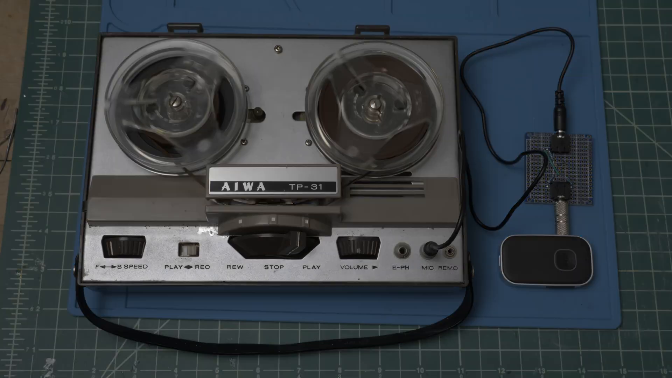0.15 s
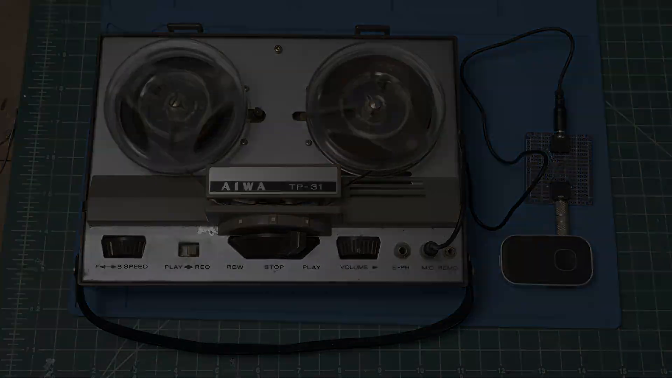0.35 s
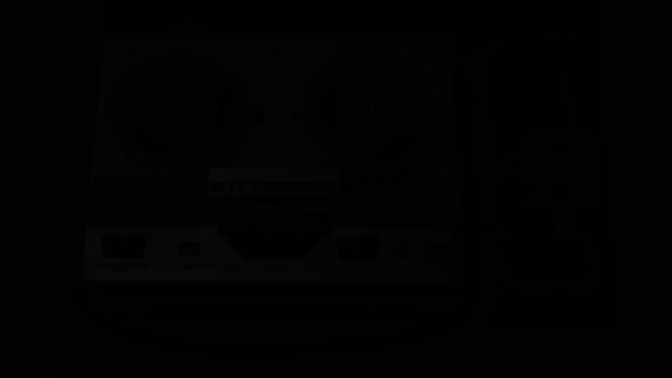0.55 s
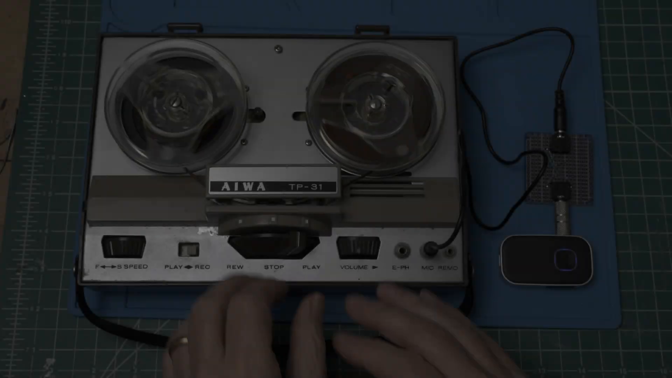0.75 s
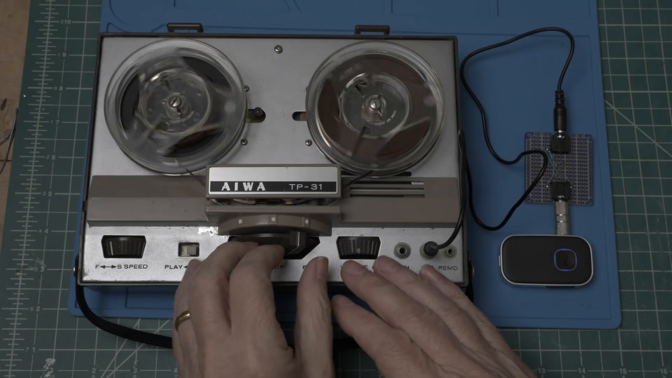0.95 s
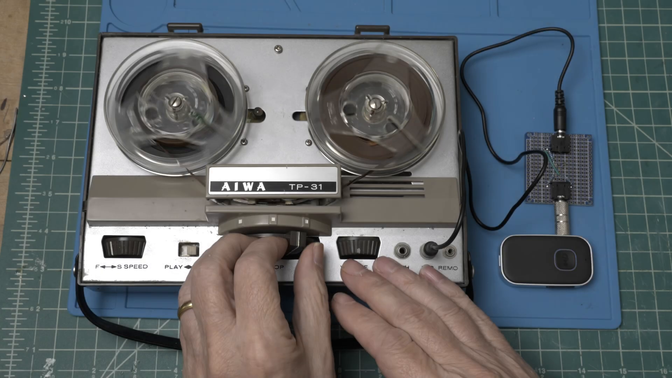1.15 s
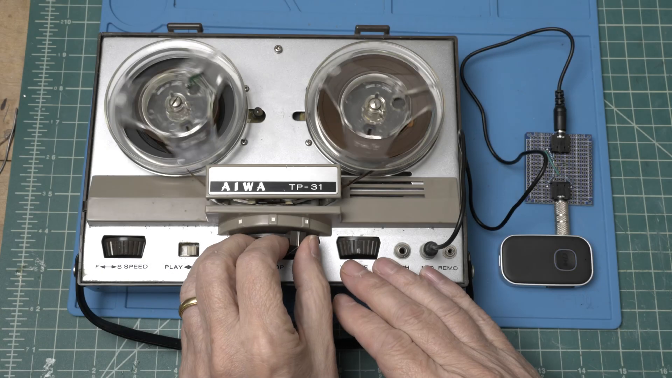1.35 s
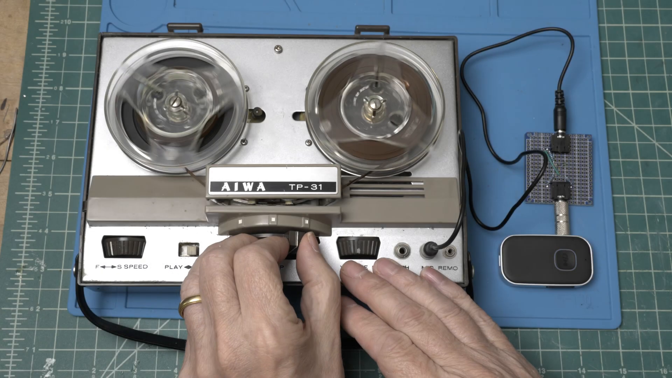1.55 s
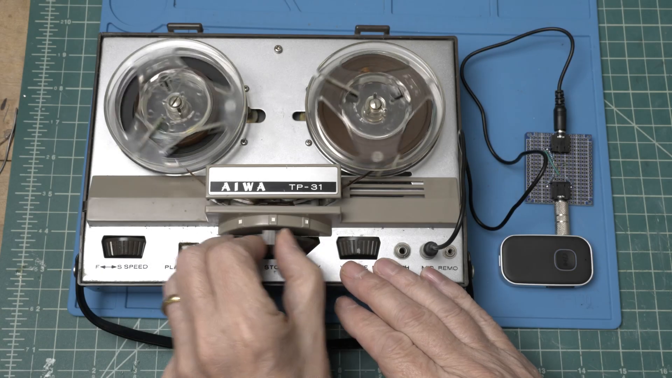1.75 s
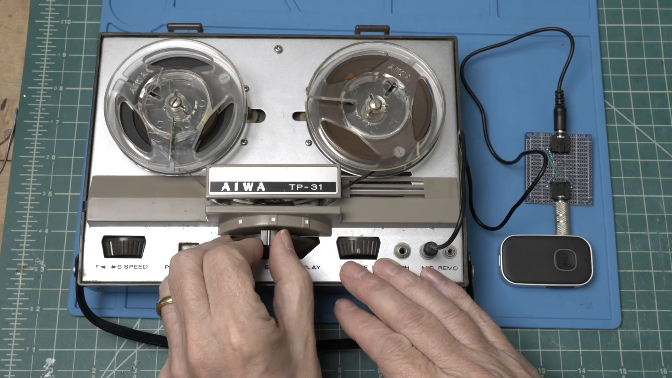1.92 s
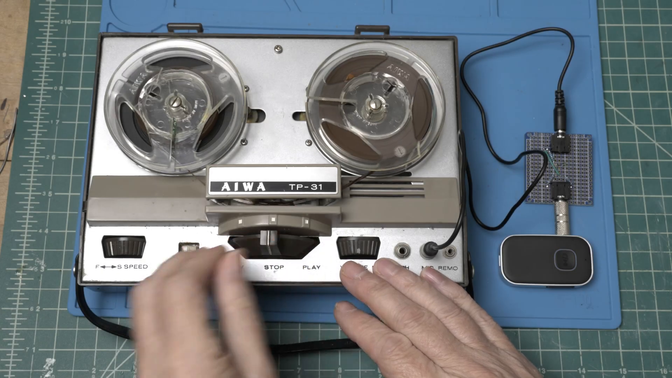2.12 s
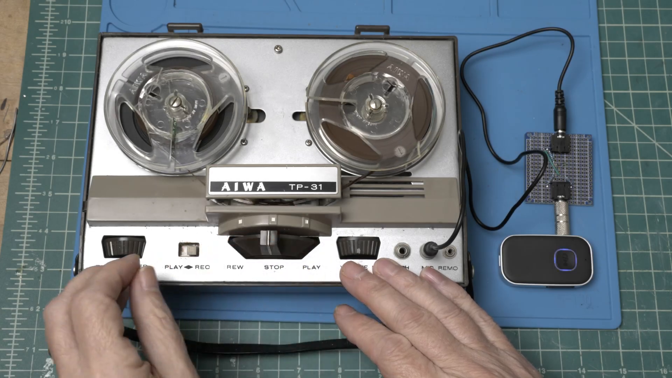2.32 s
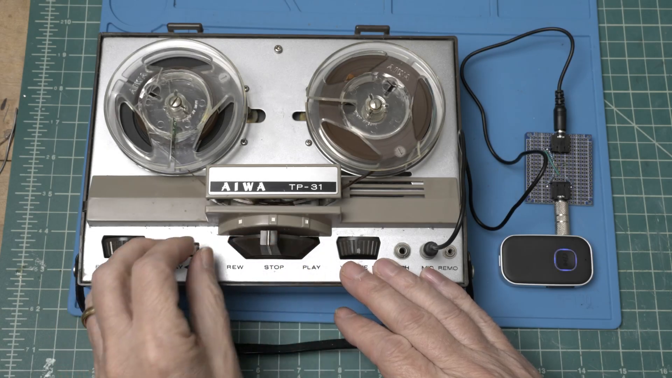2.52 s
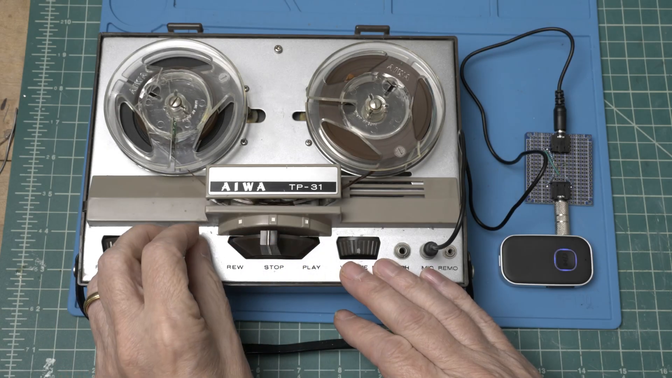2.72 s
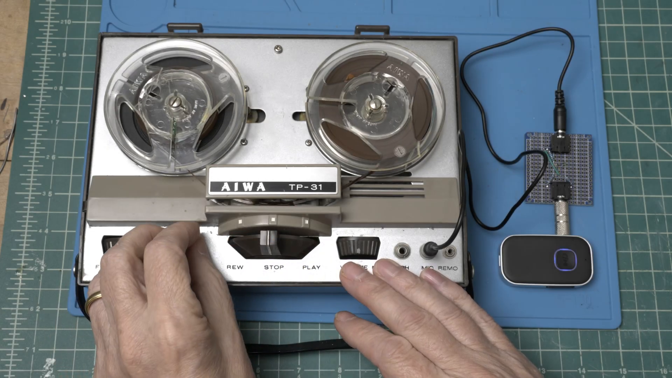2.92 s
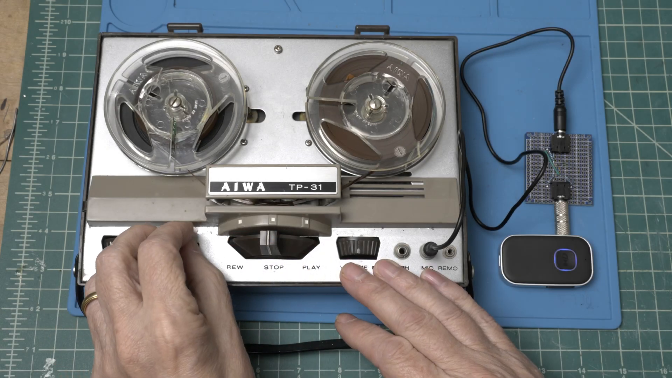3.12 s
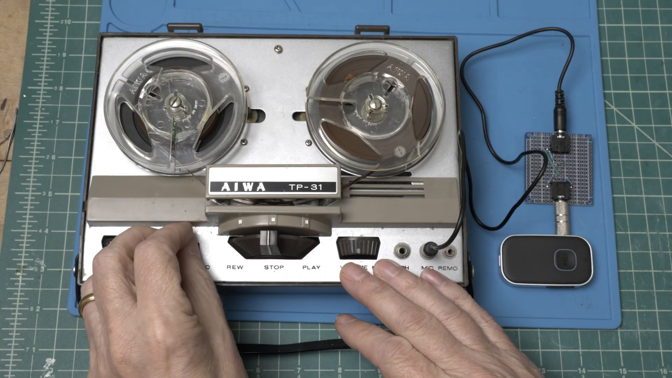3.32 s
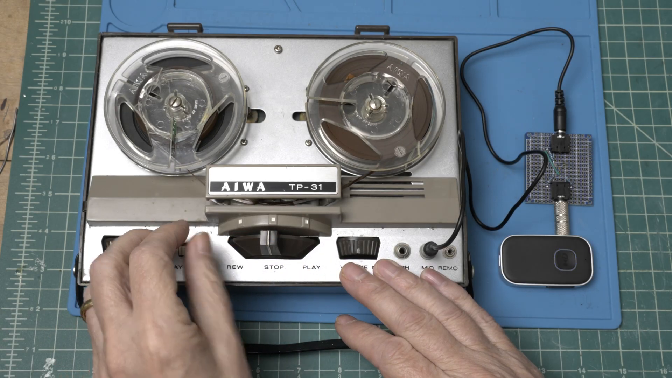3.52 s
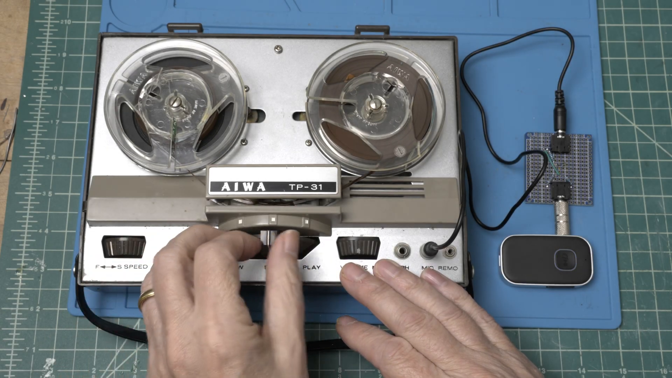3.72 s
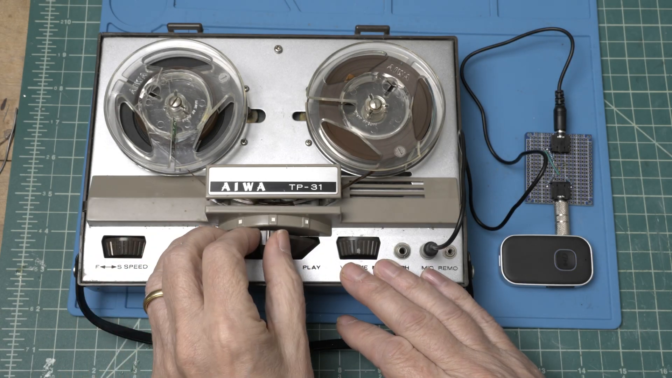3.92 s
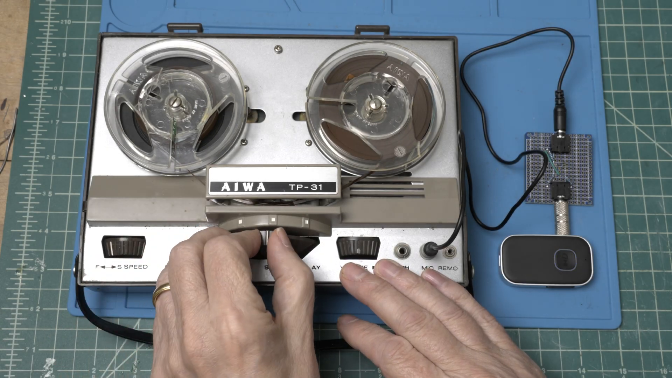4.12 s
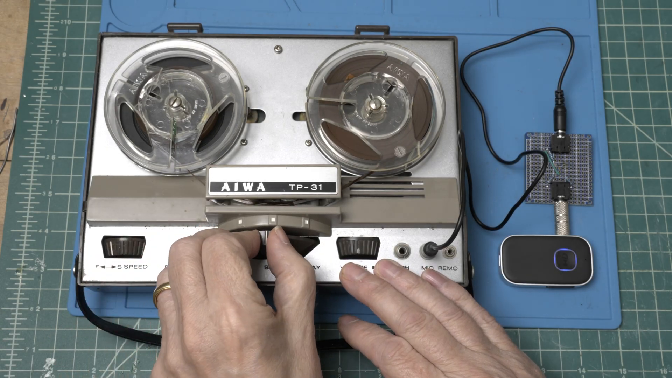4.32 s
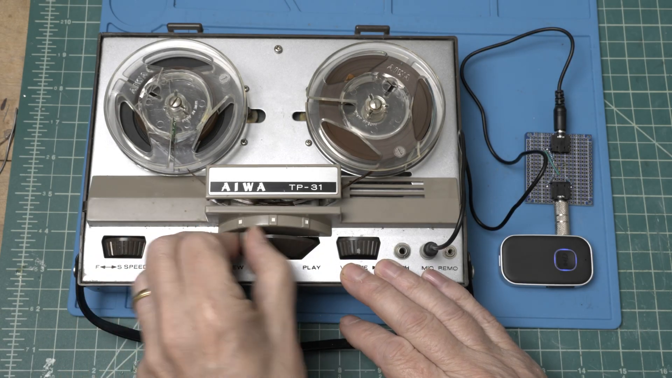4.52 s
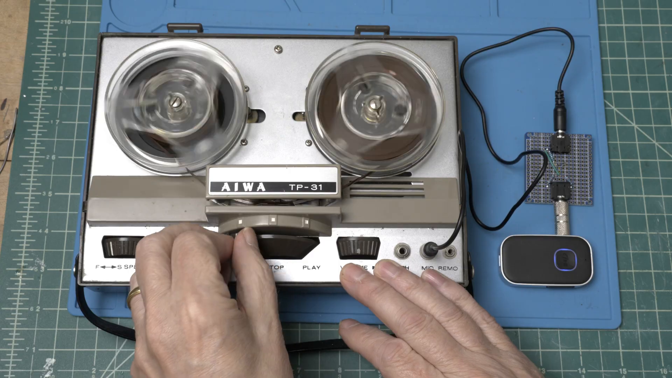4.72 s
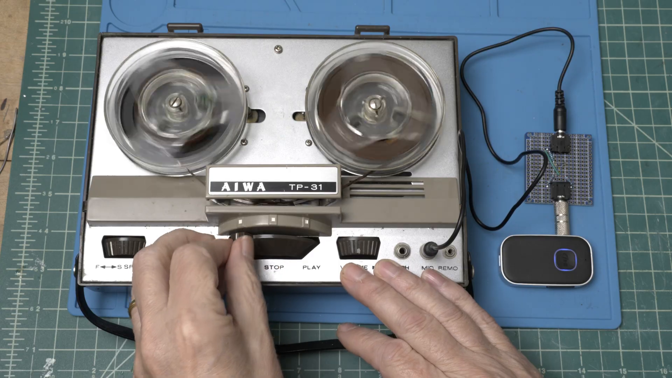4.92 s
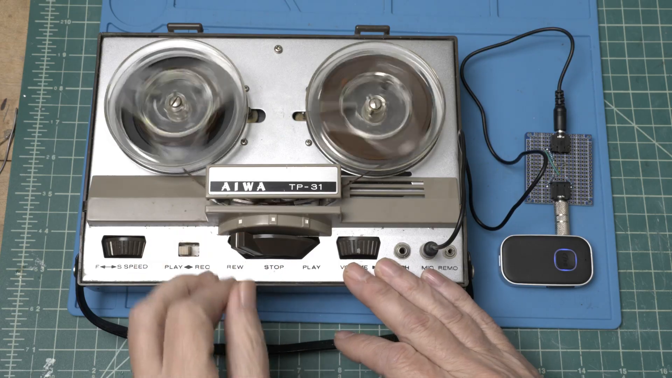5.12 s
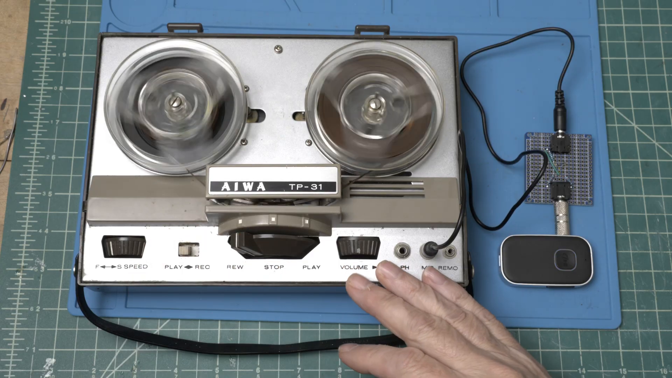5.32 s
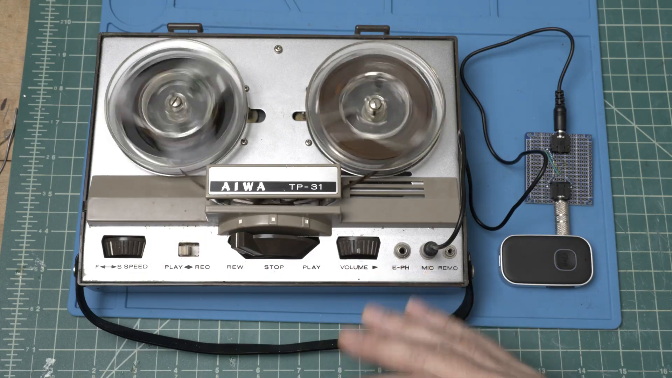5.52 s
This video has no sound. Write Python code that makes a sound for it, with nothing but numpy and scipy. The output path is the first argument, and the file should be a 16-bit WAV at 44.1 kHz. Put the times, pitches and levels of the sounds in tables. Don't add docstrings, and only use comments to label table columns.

```python
import sys
import numpy as np
from scipy import signal
from scipy.fft import rfft, irfft, next_fast_len
from scipy.io import wavfile

SR = 44100
rng = np.random.default_rng(int(sys.argv[2]) if len(sys.argv) > 2 else 0)


def bounce(signal):
    frames = np.transpose(np.atleast_2d(signal))
    limited = np.clip(frames, -1, 1)
    pcm = np.round(limited * 32767).astype(np.int16)
    wavfile.write(sys.argv[1], SR, pcm)


def linear_from_db(decibels):
    return 10 ** (np.asarray(decibels, float) / 20)


N = 249517

# start in seconds, peak in dB, case thud in dB, bright crack in dB, contact time in ms.
FINGERS = [
    (0.929, -58, -61.5, -63, 30),
    (1.0847, -60, -60, -74, 16),
    (2.075, -63, -74.5, -86, 20),
    (3.473, -41, -57, -54, 2.75),
    (3.48, -50, -74, -60, 2.4),
    (3.541, -58.5, -87.5, -78, 21),
    (3.871, -59, -60, -72, 3.8),
    (3.9063, -35.5, -51, -65, 4),
]
LEVER = [(1.7402, -29, -41.5, -65.5, 2.8), (1.7592, -10.5, -24, -32.5, 2.86),
         (1.7625, -10, -37.5, -45.5, 1.4), (1.766, -19, -30, -41.5, 0.93),
         (1.7675, -27.5, -25.5, -53.5, 0.7), (1.7735, -28.5, -39, -52, 1.4),
         (1.799, -50.5, -54, -55.5, 1.4), (1.8150, -36, -36, -40, 2.3), (1.8222, -36, -31, -36, 1.9),
         (1.8265, -41, -27, -39, 1.3), (1.8435, -44, -38, -40, 4.2), (1.868, -48, -42, -43, 2.2)]
PAWL = [
    (1.8165, -29.5, -45, -50, 2),
    (1.9135, -39, -65, -68, 1.1),
    (2.04, -72, -61, -90, 6),
    (2.082, -64, -68, -88, 7.3),
    (2.094, -59, -71, -88, 8),
    (3.54, -71, -80, -85, 8),
    (3.556, -68, -80, -85, 6),
    (4.3985, -40, -62, -59, 1.4),
]
LATCH = [(1.8218, -15.5, -45, -60, 1.2), (1.8245, -26, -48, -60, 1.5), (4.2285, -59.5, -57, -70, 9),
         (4.2542, -28.5, -32.5, -36.5, 6.8), (4.2603, -37.5, -33.5, -40.5, 3.4),
         (4.2674, -34.5, -44, -57, 4.2), (4.2944, -41, -41, -49.5, 9.4), (4.3147, -33.5, -42, -48.5, 4),
         (4.33, -46, -44.5, -58, 3.3), (4.3595, -40.5, -51.5, -58, 4), (4.3705, -39.5, -53.5, -51, 3.4),
         (4.3765, -38, -53.5, -54, 2.2), (4.399, -43, -62, -51, 2), (4.405, -50, -57, -62, 1.5),
         (4.7, -48, -66, -72, 2)]
SWITCH = [
    (3.1398, -22.5, -35.5, -17.5, 2.24),
    (3.141, -17, -43.5, -16, 2.7),
    (3.1428, -20, -41, -30, 1.2),
    (3.146, -27.5, -46.5, -34.5, 4.9),
    (3.162, -44.5, -51, -47.5, 4),
    (3.188, -48.5, -57, -49, 5),
]
CLUTCH = [(4.556, -44, -40, -53, 2.6), (4.5722, -35, -30, -26, 3.7), (4.5752, -30, -27, -11, 0.76),
          (4.5761, -4.5, -29, -33.5, 1.3), (4.5785, 0, -26, -21, 1.2), (4.5976, -7, -35, -15, 0.69),
          (4.5996, -10, -14.5, -28, 0.7), (4.6115, -22, -23, -40, 1), (4.627, -25, -32, -39.5, 0.82),
          (4.6363, -24, -26.5, -33, 1.8), (4.664, -27, -44, -38, 0.97), (4.672, -26, -40, -38, 1),
          (4.711, -25, -35, -42, 0.95), (4.722, -31, -40, -46, 0.77)]
REEL = [(4.803, -40, -44, -71, 2.6), (4.8095, -26, -32, -66, 2), (4.858, -37, -31, -66, 1.4),
        (4.88, -36, -25, -47, 1.4), (4.9047, -29.5, -48, -49.5, 1.5), (4.928, -23, -45, -62, 1.5),
        (4.966, -25, -35, -55, 2.3), (4.996, -25, -33.5, -55, 2), (5.027, -35, -21, -60, 2.6),
        (5.043, -25, -30, -60, 1.5), (5.0725, -34, -32, -45, 1.8), (5.108, -36, -28, -28.5, 6.9),
        (5.1125, -25, -35, -27, 4.2), (5.117, -30, -24, -43, 2.8), (5.152, -23.5, -50, -49, 1.9),
        (5.166, -23, -39, -40, 1.8), (5.2135, -43, -29, -55, 1.8), (5.2714, -28, -42, -55, 1.8),
        (5.292, -24.5, -31, -57, 3), (5.298, -30, -28, -55, 2.2), (5.322, -40, -24, -55, 4.1),
        (5.362, -31, -25, -60, 2), (5.3922, -13, -21.5, -40, 2.05), (5.3985, -22, -26, -45, 1.5),
        (5.4258, -22, -30, -23, 3), (5.43, -24, -47, -22, 3.8), (5.45, -38, -23.5, -50, 3),
        (5.481, -25, -36, -40, 2.8), (5.54, -32, -38, -55, 1.5), (5.55, -23, -46, -53, 1.6),
        (5.5702, -27.5, -37, -50, 1.5), (5.588, -25, -43, -50, 1.5), (5.5986, -22, -36, -45, 2.1),
        (5.63, -35, -35, -51, 2)]
KNOCKS = [
    (5.0722, -26, -25, -50, 1.4),
    (5.0742, -19, -25.5, -55, 1.3),
    (5.395, -5.5, -26.5, -50, 0.84),
    (5.4285, -24, -34, -34, 2.2),
]

# start in seconds, level in dB, sharpness in Hz.
BENCH_BLOWS = [
    (1.765, -60.5, 402),
    (1.827, -57.5, 91),
    (3.141, -68, 500),
    (4.257, -55.5, 294),
    (4.578, -66, 201),
]
# start in seconds, level in dB.
TINKLES = [
    (1.7975, -43),
    (1.8148, -30),
    (1.8174, -29),
    (1.8225, -31),
    (1.825, -33),
    (1.8435, -41),
    (1.846, -38),
]
# start in seconds, level in dB, first note in Hz, last note in Hz, length in seconds.
WHIPS = [
    (1.8186, -28.5, 2500, 700, 0.00815),
    (5.144, -33, 3190, 1490, 0.038),
    (5.478, -46, 2993, 1510, .03),
]

# time at full level in seconds, level in dB, rise in seconds per 20 dB, hold in seconds,
# fall in seconds per 20 dB.
PLAY = [
    (0, -60.5, .3, 1.78, .13),
    (2.1, -70, 0.16, 0.029, 0.22),
]
IDLER_HUM = [
    (0, -82.5, .3, 0.76, .1),
    (.49, -75, 0.29, 0.082, 0.014),
]
HANDS = [(.63, -64, 0.055, 0.039, 0.16), (.77, -58.5, 0.11, 0.015, 0.21), (1.08, -63.5, 0.99, 0.13, 0.024),
         (1.74, -56, 0.028, .001, 0.023), (2.08, -79, 0.092, .01, .25), (3.128, -54, 0.03, .001, 0.05),
         (3.47, -77, 0.046, 0.092, .07), (3.875, -70, 0.017, 0.078, 0.11),
         (4.232, -63.5, 0.026, 0.008, 0.022), (4.265, -46.5, 0.0095, 0.017, 0.085),
         (4.38, -58.5, 0.27, 0.013, 0.065), (4.57, -52.5, 0.057, .001, .025)]
SLIP = [
    (1.745, -53, .005, .001, 0.089),
    (1.785, -44.5, .02, 0.022, .03),
    (1.826, -39, 0.079, 0.0025, 0.04),
    (1.865, -44, 0.055, 0.014, 0.086),
]
WHINE = [
    (2.1, -70.5, .13, 0.12, 0.23),
    (2.6, -74.5, .2, 0.14, 0.15),
    (3.55, -82.5, .5, 0.0087, 0.39),
    (4.15, -72.5, .45, 0.47, 0.32),
]
SWITCH_TAIL = [
    (3.15, -40.5, .002, .03, 0.088),
    (3.27, -62.5, .1, 0.0394, 0.26),
]
BELT_SKID = [
    (4.582, -29.5, 0.0038, 0.021, 0.013),
    (4.606, -28, 0.0099, 0.059, 0.022),
    (4.685, -36, 0.018, 0.035, 0.068),
]
FLANGE = [
    (4.9, -54.5, -0.6, 0.045, -0.3),
    (5.05, -67, 0.5, 0.017, 0.3),
    (5.13, -57, 0.11, 0.032, 0),
    (5.31, -61, -0.48, 0.0079, -2.2),
    (5.45, -50.5, -1.9, 0.028, 0),
    (5.63, -57.5, -1.5, .03, .1),
]

# pitch in Hz, width in Hz, level in dB.
CASE = [(428.5, 23, 1), (463.2, 22.3, 7.5), (500, 42, 3.5), (597, 51, 0.5), (677, 35, -3.5),
        (746, 11.3, 1.5), (955, 60, -5)]
PANEL = [(1280, 130, -2.5), (1667, 104, -3.5), (2085, 270, -7), (2492, 64, -2), (2639, 46, 2),
         (3030, 110, 1.5), (3350, 110, -5), (3700, 190, -12), (4360, 840, -20)]
BRAKE_CASE = [(490, 56, -0.5), (650, 70, 1.5), (755, 92, -2), (1000, 160, -6)]
BRAKE_ARM = [(1240, 100, -12), (2084, 400, -13.5), (2535, 39, 1), (2580, 50, 5.5), (2840, 47, 1.5),
             (3080, 74, -3.5), (3365, 270, -8.5), (3700, 140, -10.5), (4400, 330, -16.5)]
CLUTCH_ARM = [(1290, 630, -8.5), (2040, 170, -4), (2786, 160, 2.5), (3330, 120, 2.5), (3680, 310, -10),
              (4080, 240, -9)]
LATCH_ARM = [(1644, 78, 2), (1870, 80, -6.5), (2160, 98, -1.5), (2470, 90, -7), (2725, 73, -10.5),
             (3050, 90, -4), (3500, 120, -8), (3710, 150, -10)]
KNOB = [(472, 56, 3), (654, 130, -6.5), (1015, 110, 0), (1155, 78, 1), (1300, 170, -5), (1650, 220, -8)]
SWITCH_BODY = [(1240, 900, -4.5), (1950, 32, -7.5), (2770, 860, -2.5), (3310, 280, 4.5), (3787, 200, 5),
               (4084, 51, -26), (4510, 190, -13.5)]
SWITCH_RING = [(1200, 70, -5), (1550, 56, -7), (2640, 90, -8), (2993, 80, -2), (3720, 170, -1.5),
               (4630, 120, -2.5), (4930, 300, -4), (5640, 200, -3.5), (5920, 120, -3.5), (6600, 300, -9),
               (8400, 2500, -18)]
FACE_PLATE = [(602, 91, -1.5), (895, 70, -9), (960, 61, 3), (1360, 200, -4.5), (1640, 90, -1)]
HUB = [(1360, 100, -5), (2010, 230, -10.5), (2500, 87, -1.5), (2620, 89, 2.5), (2970, 266, -0.5),
       (3490, 300, -6.5), (4120, 400, -21.5)]
KNOCK_CASE = [(480, 90, -2), (1350, 140, -6), (1844, 75, 2.5)]
KNOCK_HUB = [(2450, 160, -2), (2686, 78, 3.5), (3020, 210, -2.5), (3630, 300, -9.5), (4500, 240, -16)]
SPRING = [(6920, 200, -7), (7320, 150, -10.5), (9140, 250, -8.5), (11020, 250, -2.5), (12400, 400, -8.5),
          (14200, 400, -11.5), (15500, 300, -12)]
CAPSTAN = [(676, 20, -13), (1040, 20, -21), (1210, 76, -8), (1840, 37, -1.5), (2160, 72, -7),
           (3230, 28, -1), (3510, 280, 0), (4405, 38, -18), (4950, 31, -9), (5290, 240, -8.5),
           (6950, 240, -11), (8390, 52, -33), (9100, 210, -15.5), (10480, 130, -13)]
MOTOR_TONES = [(660, 10, -6), (1000, 12, -6), (1843, 10, -8), (2313, 8, .5), (3033, 30, -4),
               (3541, 10, -.5), (4400, 14, -8)]
IDLER = [(597, 9, 0), (524, 9, -1.5)]
BENCH = [(65.4, 9.3, 7), (80, 11, -1), (120, 20, -8.5), (206, 35, -3.5), (251.2, 18, -3), (330, 38, -12.5)]
AIR_DUCT = [(64.7, 35, -13.5), (76.7, 9.9, 0), (120.7, 2.7, 4), (188, 75, -14.5), (214, 16, -7.5),
            (247, 7.6, -17)]
LAMP_WHINE = [(3740, 240, 5), (3040, 610, -7.5), (4540, 270, -11.5)]

# frequency in Hz, density in dB per Hz.
HISS = [(160, -30), (280, -5), (900, -9.5), (2750, -19.5), (3730, -21.5), (5240, -30), (12200, -25.5),
        (16000, -28)]
RUSTLE = [(400, -32.5), (900, -3.5), (1400, -3), (2500, -1.5), (4000, -8), (8000, -19), (15000, -22.5)]
SWISH = [(2350, -32), (4000, -21), (5350, -2.5), (8210, -6.5), (10400, -7.5), (11500, -14), (16000, -18)]
PLAY_BED = [(300, -26), (598, -9), (826, -41.5), (1560, -20.5), (2290, -0.5), (5350, -21), (10500, -23.5),
            (16000, -30.5)]
SLIP_COLOUR = [(220, -42.5), (424, -4), (745, -6.5), (1900, -5), (2520, 0.5), (4430, -12), (7670, -28.5),
               (16000, -43.5)]
BELT_COLOUR = [(220, -42.5), (500, -4), (1000, -7), (1900, -9), (2600, 0.5), (4600, -6.5), (6000, -18),
               (16000, -42)]

# frequency in Hz, t60 in seconds, level in dB.
ROOM = [(500, 0.23, -29), (1030, 0.19, -22), (1860, 0.36, -33), (4300, 0.34, -28), (6500, 0.23, -27.5),
        (8995, 0.22, -29), (12900, 0.51, -31.5)]
# time in seconds, gain in dB.
GAIN = [(0, -6.5), (.4, -9), (1.6, -8.5), (1.95, -2), (2.2, -7), (2.5, 0), (3.15, -3), (3.35, -8.5),
        (3.85, 2), (4.15, -2), (4.6, 2), (5.05, 7), (5.45, 8), (5.66, 1.5)]

WIND_START_S, RUN_UP_S, TURN_S, HEAVIEST_S = 4.566, 0.39, 0.327, 5.135
ECCENTRIC = 0.21
CASE_DB, CASE_SWELL_DB = -33.5, 2.4
PANEL_DB, PANEL_SWELL_DB, PANEL_LAG_S = -35, 1, 0.0035
SWISH_DB, AIR_DB = -57, -52
RUMBLE_DB, HISS_DB = -58, -72.5
HISS_FOLLOWS, PLAY_FOLLOWS = 0.51, 0.6
CHATTER = 0.72
LATE_TAIL_DB, LATE_STRETCH = -16, 2.2
SWITCH_ROOM_DB = -1.5
OVERLOAD = 0.72


def rms_one(x):
    return x / np.sqrt(np.mean(x ** 2) + 1e-20)


def automatic_gain_db():
    s, db = np.transpose(GAIN)
    return np.interp(np.arange(N) / SR, s, db)


def drift(rate):
    r = np.exp(-2 * np.pi * rate / SR)
    noise = rng.standard_normal(N + SR)
    return rms_one(signal.lfilter([1], [1, -2 * r, r * r], noise)[SR:])


def coloured(x, spectrum):
    hz, db = np.transpose(spectrum)
    size = next_fast_len(N)
    bins = np.fft.rfftfreq(size, 1 / SR) + 1
    gain = linear_from_db(np.interp(np.log(bins), np.log(hz), db, left=-70, right=-70))
    return rms_one(irfft(rfft(x, size) * gain, size)[:N])


def resonate(x, peaks):
    out, power = 0, 0
    for k, (hz, width, db) in enumerate(peaks):
        r = np.exp(-np.pi * width / SR)
        gain = (-1) ** k * linear_from_db(db) * (1 - r * r) / 2
        poles = [1, -2 * r * np.cos(2 * np.pi * hz / SR), r * r]
        out = out + signal.lfilter([gain, 0, -gain], poles, x + 1e-18)
        power += linear_from_db(db) ** 2 * (1 - r * r) / 2
    return out / np.sqrt(power)


def shifting(x, peaks, swing_db, rate):
    out = 0
    for k, peak in enumerate(peaks):
        gain = (-1) ** k * linear_from_db(peak[2] + swing_db * drift(rate)) * np.sqrt(peak[1])
        out = out + gain * resonate(x, [peak])
    return rms_one(out)


def steep(x, hz, kind, order=4):
    return signal.sosfilt(signal.butter(order, hz, kind, fs=SR, output="sos"), x)


def strokes(rows):
    t = np.arange(N) / SR
    total = 0
    for s, db, rise, hold, fall in rows:
        before = np.maximum(s - t, 0) / max(rise, .002)
        after = np.maximum(t - s - hold, 0) / max(fall, .002)
        total = total + linear_from_db(db - 20 * before - 20 * after)
    return total


def grains(per_s, spread_db, smooth):
    sizes = linear_from_db(spread_db * np.minimum(rng.exponential(1, N), 4)) * rng.choice([-1, 1], N)
    clicks = rms_one(sizes * (rng.random(N) < per_s / SR))
    return rms_one(clicks + smooth * rng.standard_normal(N))


def throb(hz, depth, wander):
    turns = np.cumsum(hz * (1 + wander * drift(2.0))) / SR
    return 1 + depth * np.cos(2 * np.pi * turns)


def contacts(table, case, body, case_db, body_db, crack_db, damping):
    bursts, noise = np.zeros((3, N)), rng.standard_normal((3, N))
    after = np.arange(SR // 16) / SR
    for s, peak_db, thud_db, bright_db, contact_ms in table:
        at = round(s * SR)
        dying = np.exp(-after * 1000 / max(contact_ms, .2))[:N - at]
        end = at + len(dying)
        rattle = CHATTER * dying * noise[:, at:end]
        rattle[:2, 0] = np.sqrt(np.sum(dying ** 2))
        bursts[:, at:end] += linear_from_db([[thud_db], [peak_db], [bright_db]]) * rattle
    thud, knock, crack = bursts
    held = [1, damping, 1]
    thud = linear_from_db(case_db) * resonate(thud, np.multiply(case, held))
    knock = linear_from_db(body_db) * resonate(knock, np.multiply(body, held))
    crack = steep(steep(crack, 2500, "high", order=2), 8200, "low", order=2)
    return thud + knock + linear_from_db(crack_db + 1.5) * crack


def wind_speed():
    return 1 - np.exp(-np.maximum(np.arange(N) / SR - WIND_START_S, 0) / RUN_UP_S)


def load(lag_s):
    angle = 2 * np.pi * (np.arange(N) / SR - HEAVIEST_S - lag_s) / TURN_S
    return np.cos(2 * angle) + ECCENTRIC * np.cos(angle)


def room_tone():
    gain_db = automatic_gain_db()
    rumble = steep(resonate(rng.standard_normal(N), AIR_DUCT), 230, "low", order=3)
    rumble = rumble * linear_from_db(RUMBLE_DB + gain_db + 2.0 * drift(3.7))
    hiss_level = linear_from_db(HISS_DB + HISS_FOLLOWS * gain_db) + linear_from_db(AIR_DB) * wind_speed() ** 2
    hiss = coloured(rng.standard_normal(N), HISS) * hiss_level * linear_from_db(0.96 * drift(10))
    whine = resonate(rng.standard_normal(N), LAMP_WHINE) * strokes(WHINE)
    return rumble + hiss + whine


def playing():
    rolling = throb(63.0, 0.17, 0.021) * rng.standard_normal(N)
    whirr = resonate(rolling, CAPSTAN) + linear_from_db(0.5) * coloured(rng.standard_normal(N), PLAY_BED)
    whistle = rms_one(resonate(resonate(rng.standard_normal(N), MOTOR_TONES), MOTOR_TONES))
    transport = whirr * strokes(PLAY) + linear_from_db(-2.0) * whistle * strokes(PLAY[:1])
    return transport * linear_from_db(PLAY_FOLLOWS * automatic_gain_db() + 0.97 * drift(24))


def idler():
    hum = resonate(resonate(rng.standard_normal(N), IDLER), IDLER)
    return rms_one(hum) * strokes(IDLER_HUM)


def hands():
    rub = grains(3000, 1.7, 7.1)
    plate = linear_from_db(-11) * resonate(rub, FACE_PLATE[1:])
    return (coloured(rub, RUSTLE) + plate) * strokes(HANDS) * linear_from_db(1.4 * drift(35))


def fingers():
    return contacts(FINGERS, FACE_PLATE, SWITCH_BODY, 3.8, -8.0, 4.94, damping=0.59)


def workshop(x):
    room_hz, t60, room_db = np.transpose(ROOM)
    tail, white, fill = 0, rng.standard_normal((2, N)), np.exp(-1 / (0.0016 * SR))
    for k, hz in enumerate(400 * 2 ** np.arange(.25, 5.3, .5)):
        edges = [hz / 2 ** .25, hz * 2 ** .25]
        keep = linear_from_db(-120 / (np.interp(hz, room_hz, t60) * SR))
        energy = signal.lfilter([1 - fill], [1, -fill], steep(x, edges, "band", order=1) ** 2)
        early = signal.lfilter([1 / SR], [1, -keep], energy)
        late = signal.lfilter([linear_from_db(2 * LATE_TAIL_DB) / SR], [1, -keep ** (1 / LATE_STRETCH)], energy)
        noise = rms_one(steep(white[k % 2], edges, "band", order=2))
        tail = tail + linear_from_db(np.interp(hz, room_hz, room_db) + 30) * np.sqrt(early + late) * noise
    return tail


def lever():
    return contacts(LEVER, BRAKE_CASE, BRAKE_ARM, 2.2, -1.5, 3.5, damping=0.9)


def slipping():
    skid, grip = grains(5000, 1.3, 1.5), linear_from_db(1.4 * drift(60))
    brakes = coloured(skid, SLIP_COLOUR) * strokes(SLIP)
    belt = coloured(skid, BELT_COLOUR) * strokes(BELT_SKID)
    return (brakes + belt) * grip


def bench():
    push = np.zeros(N)
    for s, db, sharp_hz in BENCH_BLOWS:
        blow = np.hanning(round(SR / sharp_hz))
        push[round(s * SR):][:len(blow)] += linear_from_db(db + 40) * blow / blow.sum()
    return steep(resonate(push, BENCH), 48, "high", order=3)


def spring():
    out = 0
    for mode in SPRING:
        clicks = np.zeros(N)
        for s, db in TINKLES:
            clicks[round(s * SR)] = linear_from_db(db + 9 + 3.3 * rng.standard_normal())
        out = out + linear_from_db(mode[2]) * resonate(clicks, [mode])
    return out


def pawl():
    return contacts(PAWL, KNOB, CLUTCH_ARM, 0.1, 0.1, 0.1, damping=1.7)


def whips():
    out, rough = np.zeros(N), drift(300)
    for s, db, start_hz, end_hz, length in WHIPS:
        share = np.arange(round(length * SR)) / round(length * SR)
        phase = 2 * np.pi * np.cumsum(start_hz + (end_hz - start_hz) * share ** 1.5) / SR
        at = round(s * SR)
        end = at + len(share)
        out[at:end] += linear_from_db(db) * np.sin(np.pi * share) * np.sin(phase) * (.6 + 0.72 * rough[at:end])
    return out


def latch():
    return contacts(LATCH, KNOB, LATCH_ARM, 4.4, -7.0, 1.8, damping=0.6)


def switch():
    return contacts(SWITCH, KNOB, SWITCH_BODY, -0.5, 0.37, 5.9, damping=1.0)


def switch_tail():
    air = rng.standard_normal(N)
    full_ring = resonate(air, SWITCH_RING) * strokes(SWITCH_TAIL[:1])
    return full_ring + resonate(air, SWITCH_RING[3:]) * strokes(SWITCH_TAIL[1:])


def clutch():
    return contacts(CLUTCH, CASE, CLUTCH_ARM, 3.9, -0.48, 1.3, damping=1.92)


def fast_wind():
    speed, wheel = wind_speed(), throb(44.26, 0.068, 0.0307)
    case_level = linear_from_db(CASE_DB + CASE_SWELL_DB * load(0) + 1.1 * drift(23))
    case = resonate(wheel * grains(4000, 1.5, 2.5), CASE) * case_level
    rush = linear_from_db(-12.5) * coloured(wheel * grains(4400, 2.3, 1.5), SLIP_COLOUR)
    panel = shifting(wheel * grains(3500, 1.5, 1.6), PANEL, swing_db=1.0, rate=23)
    panel_level = linear_from_db(PANEL_DB + PANEL_SWELL_DB * load(PANEL_LAG_S) + 0.96 * drift(41))
    swish_level = (speed * linear_from_db(SWISH_DB) + strokes(FLANGE)) * linear_from_db(3.2 * drift(24))
    swish = coloured(grains(4100, 2.3, 2.3), SWISH) * swish_level
    return speed * (case + (panel + rush) * panel_level) + swish


def reel():
    return contacts(REEL, CASE, HUB, 0.88, -2.7, 1.3, damping=1.24)


def knocks():
    return contacts(KNOCKS, KNOCK_CASE, KNOCK_HUB, 0.1, -3.0, 0.1, damping=1.4)


def scene():
    snap = switch()
    hits = fingers() + lever() + spring() + latch() + snap + clutch() + reel()
    echo = workshop(hits - (1 - linear_from_db(SWITCH_ROOM_DB)) * snap)
    deck = hits + echo + slipping() + whips() + fast_wind()
    deck = steep(deck, 395, "high", order=6)
    dry_hits = steep(pawl() + switch_tail() + knocks(), 460, "high", order=6)
    quiet = room_tone() + playing() + idler() + hands() + bench()
    return (deck + quiet + dry_hits)[None]


def band_limit(x):
    return signal.sosfilt(signal.butter(12, 16480, fs=SR, output="sos"), x)


def record(dry):
    excess = dry - OVERLOAD * np.tanh(dry / OVERLOAD)
    rounded = dry - steep(excess, 400, "high")
    top_cut = signal.cheby2(12, 70, 16500, fs=SR, output="sos")
    return band_limit(signal.sosfilt(top_cut, rounded))


dry = scene()
out = record(dry)
bounce(out)
```